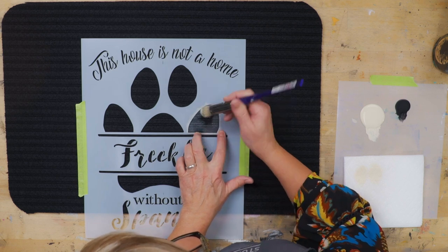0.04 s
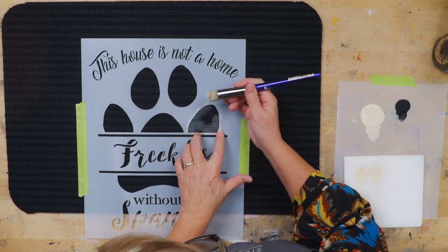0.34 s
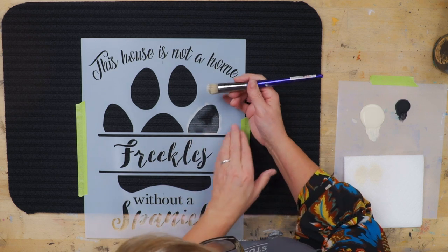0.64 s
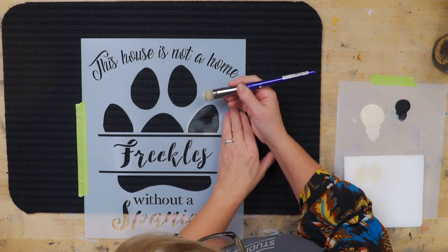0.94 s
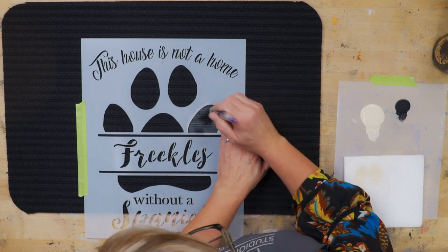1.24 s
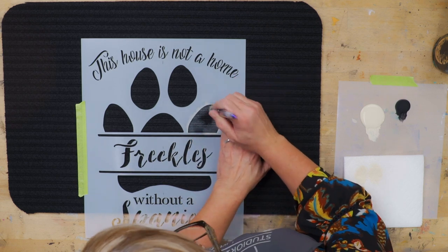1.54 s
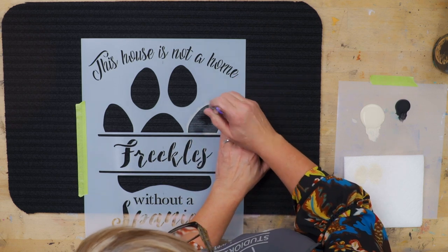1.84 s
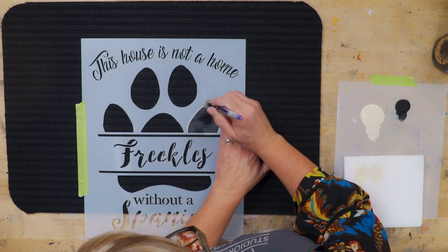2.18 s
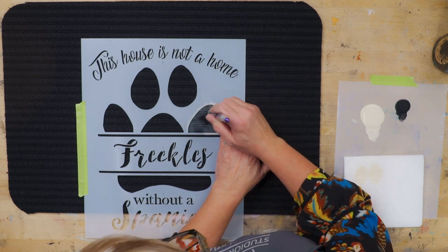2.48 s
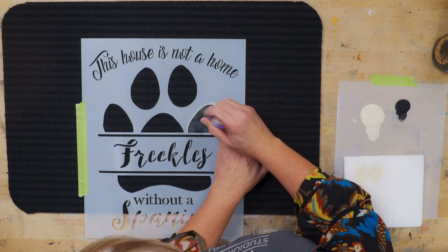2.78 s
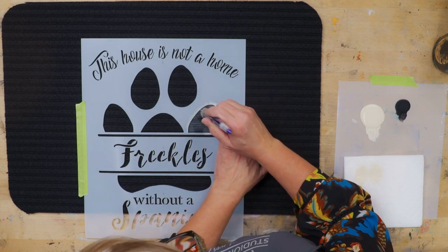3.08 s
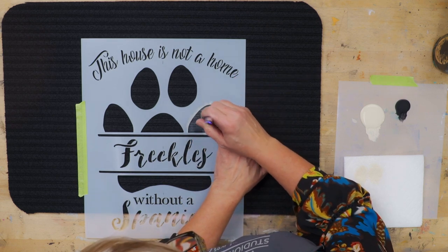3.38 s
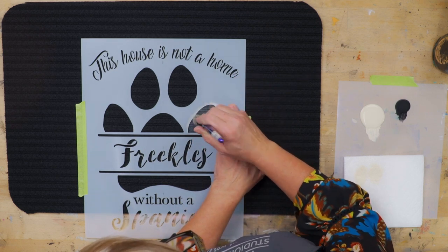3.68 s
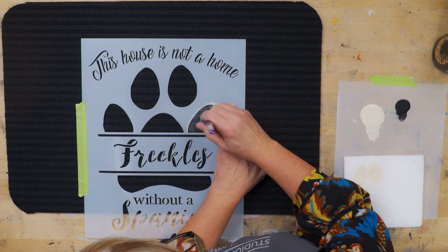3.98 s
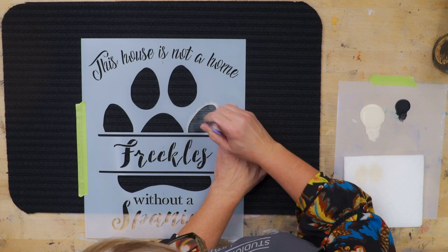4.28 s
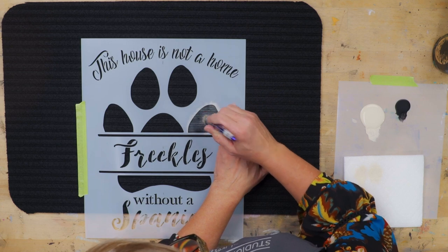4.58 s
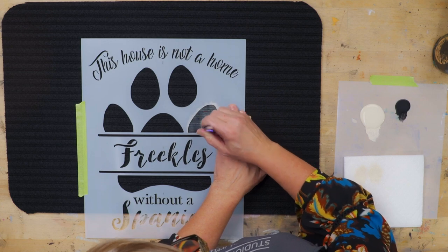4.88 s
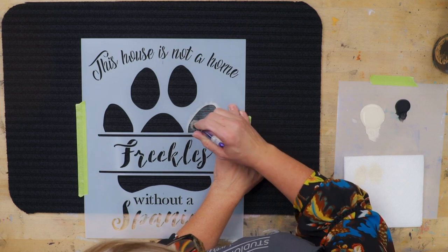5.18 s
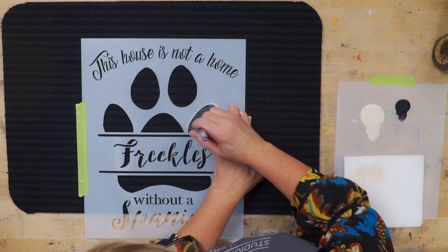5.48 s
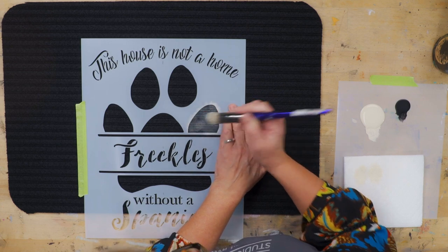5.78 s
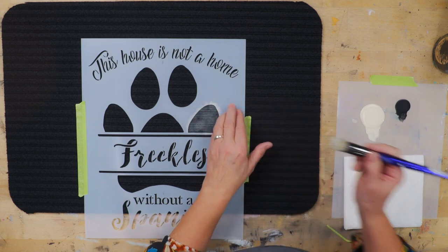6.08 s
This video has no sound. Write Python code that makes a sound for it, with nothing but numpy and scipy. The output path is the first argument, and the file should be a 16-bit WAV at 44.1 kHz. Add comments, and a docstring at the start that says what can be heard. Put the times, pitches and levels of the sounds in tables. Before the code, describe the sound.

In a small, quietly humming room, a hand rustles and slides over a plastic stencil. A bristle brush then dabs through it onto a rubber mat, about five times a second, each dab a short crunch with a soft, hollow table thump. The loose plastic chatters at first, then settles. Finally the hand slides again and lands with a light knock. One microphone hangs above the table.

```python
"""A hand rustles and slides over a plastic stencil on a work table, in a small, quietly humming room.
Then a stencil brush stipples through it onto a rubber mat, about five dabs a second: each a short
crunch of bristles and a soft thump of the table. At first the stencil's loose edge chatters too,
until the dabs pin it down. Last, the hand slides again and settles with a light knock.
One microphone above the table hears it all."""
import sys
import numpy as np
from scipy import signal
from scipy.fft import rfft, irfft
from scipy.io import wavfile
from scipy.ndimage import uniform_filter1d

SR = 44100
rng = np.random.default_rng(int(sys.argv[2]) if len(sys.argv) > 2 else 0)


def generate_wav(sig):
    """Save sig (samples, or channels by samples) to the path in sys.argv[1] as 16-bit PCM at SR."""
    pcm = np.round(np.clip(np.atleast_2d(sig).T, -1, 1) * 32767).astype(np.int16)
    wavfile.write(sys.argv[1], SR, pcm)


N = 274963
TIME = np.arange(N) / SR

# dabs of the brush: (time of greatest force [s], force [dB], contact noise [dB])
DABS = [(1.2951, -32, -43.5), (1.4948, -27.5, -45), (1.6824, -27, -46), (1.87, -27, -45),
        (2.056, -24.5, -43.5), (2.246, -25, -44.5), (2.4429, -27.5, -56.5), (2.628, -25, -60.5),
        (2.8198, -21.5, -57.5), (3.01, -23, -56.5), (3.196, -26, -58.5), (3.3908, -24, -56.5),
        (3.572, -25.5, -56.5), (3.757, -24, -57), (3.9498, -25.5, -59.5), (4.1309, -25, -56),
        (4.3209, -21.5, -56.5), (4.5066, -23.5, -55.5), (4.6972, -24.5, -55), (4.8932, -24.5, -54),
        (5.0782, -24, -56), (5.268, -24.5, -58.5), (5.4498, -24, -51.5)]


def amp(db):
    """Decibels to gain."""
    return 10 ** (np.asarray(db) / 20)


def unit(x):
    """Scales to rms 1."""
    return x / np.sqrt(np.mean(x ** 2) + 1e-24)


def along(points, hz):
    """Reads a table on a log-frequency axis."""
    f, value = np.transpose(points)
    return np.interp(np.log(hz + 1), np.log(f + 1), value)


def add(mix, s, sound):
    """Mixes a sound in at time s."""
    part = mix[max(round(s * SR), 0):][:len(sound)]
    part += sound[:len(part)]


def tint(x, spectrum):
    """Colours a long sound; rms 1."""
    gain = amp(along(spectrum, np.fft.rfftfreq(len(x), 1 / SR)))
    return unit(irfft(rfft(x) * gain, len(x)))


def response(spectrum, size=2048):
    """The causal click that has this spectrum; energy 1."""
    log_gain = np.log(amp(along(spectrum, abs(np.fft.fftfreq(size, 1 / SR)))))
    click = np.fft.ifft(np.exp(np.conj(signal.hilbert(log_gain)))).real[:size // 2]
    return click / np.linalg.norm(click)


def narrow(hz, width):
    """A wavering tone: noise in one narrow resonance."""
    f = np.fft.rfftfreq(N, 1 / SR)
    return unit(irfft(rfft(rng.standard_normal(N)) / (1 + (2 * (f - hz) / width) ** 2), N))


def grains(count, spread_db):
    """Dense tiny slips of uneven size."""
    sizes = np.minimum(rng.standard_normal(count), 2.6)
    return unit(rng.standard_normal(count) * amp(spread_db * sizes))


def wobble(count, size):
    """Random drift, smoothed over size samples; rms 1."""
    return unit(uniform_filter1d(rng.standard_normal(count), size=size))


def sway(s, period_s, crest_s):
    """A slow swing between -1 and 1."""
    return np.cos(2 * np.pi * (s - crest_s) / period_s)


def glide(hz):
    """A sine that follows a moving pitch."""
    return np.sin(2 * np.pi * np.cumsum(hz) / SR)


def mode(t, hz, db, t60):
    """One resonance, dying by 60 dB in t60 seconds."""
    return amp(db - 60 * t / t60) * np.sin(2 * np.pi * hz * t)


def impact(spectrum, decay_s, count):
    """A short, coloured burst of noise; peak 1."""
    t = np.arange(count) / SR
    burst = signal.fftconvolve(rng.standard_normal(count) * np.exp(-t / decay_s), response(spectrum))
    return burst / abs(burst).max()


def tail(build_s, size=16384):
    """Diffuse room echoes that build up and die band by band; energy 1."""
    # decay of the small room: (frequency [Hz], t60 [s])
    room_decay = [(100, 1), (400, 0.75), (1000, 0.43), (3500, 0.3), (8000, 0.41), (16000, .17)]
    hz, t, bands = signal.stft(rng.standard_normal(size), SR, nperseg=256)
    decay = amp(-60 * t / along(room_decay, hz)[:, None])
    diffuse = signal.istft(bands * decay, SR, nperseg=256)[1]
    diffuse *= 1 - np.exp(-np.arange(len(diffuse)) / SR / build_s)
    return diffuse / np.linalg.norm(diffuse)


def echoes(near_db=-9.0, far_db=-21.5, far_s=0.031):
    """Echoes from things near the table, then those from the far walls."""
    out = amp(near_db) * tail(0.0013)
    add(out, far_s, amp(far_db) * tail(0.0011))
    return out


def room(x):
    """Direct sound at the microphone, and its echoes."""
    return x + signal.fftconvolve(x, echoes())[:N]


def room_tone(air_db=-53.0, whine_db=-81, whine_hz=1372, waver_hz=13):
    """Ventilation rumble, its hum and a faint whine that slowly swells and fades."""
    # spectrum of the rumble: (frequency [Hz], relative level [dB])
    air_spectrum = [(10, -20), (25, 3), (36, 0.5), (55, 0), (85, -12), (130, -16), (220, -18), (330, -22.5),
                    (600, -24.5), (1350, -31.5), (2300, -40.5), (5000, -47.5), (10000, -55), (16000, -54.5)]
    # steady tones of the room: (frequency [Hz], width [Hz], level [dB])
    hum_tones = [(47.1, 1.65, -55.5), (119.67, 1.7, -63.5), (168, 5, -80.5), (297.3, 6.7, -74.5),
                 (421.4, 3, -79), (776, 5.4, -82.5), (8000, 4.4, -99)]
    air = amp(air_db) * tint(rng.standard_normal(N), air_spectrum)
    hum = sum(amp(db) * narrow(hz, width) for hz, width, db in hum_tones)
    swell = amp(whine_db + 5 * sway(TIME, period_s=1.7, crest_s=1.03))
    whine = unit(glide(whine_hz + waver_hz * wobble(N, 1000)))
    return air + hum + swell * whine


def strokes(rows, rise_db_per_s, fall_db_per_s):
    """Gain of hand movements that each swell, hold and die away."""
    return sum(amp(db - rise_db_per_s * np.maximum(s - TIME, 0)
                   - fall_db_per_s * np.maximum(TIME - s - hold, 0)) for s, hold, db in rows)


def hand(spread_db=4.0, crinkle_db=4.0):
    """The palm hisses over the plastic; under the fingers the sheet crinkles in short clumps."""
    # movements of palm and fingers: (time at full speed [s], hold [s], level [dB])
    slides = [(.3, .02, -83), (.69, 0.37, -73), (3.42, .1, -80), (6.02, 0.052, -63.5)]
    rustles = [(.135, 0.073, -67), (.95, 0.042, -73.5)]
    # spectra of skin and sheet: (frequency [Hz], relative level [dB])
    slide_spectrum = [(300, -11), (1200, 6.5), (2000, -2), (3600, 0), (5200, -6), (7500, -6),
                      (11000, -12.5), (16000, -20)]
    rustle_spectrum = [(400, -7), (1400, -12), (2300, -4), (3400, -6.5), (4500, -21.5), (8000, -27),
                       (16000, -39)]
    clumps = amp(crinkle_db * wobble(N, 300))
    hiss = tint(grains(N, spread_db), slide_spectrum)
    crinkle = unit(clumps * tint(grains(N, spread_db), rustle_spectrum))
    return (hiss * strokes(slides, rise_db_per_s=66, fall_db_per_s=62)
            + crinkle * strokes(rustles, rise_db_per_s=100, fall_db_per_s=56))


def sheet_ticks(gain_db=-10.0):
    """Tiny snaps of the plastic sheet under the fingers."""
    # snaps: (time [s], relative peak [dB], centre [Hz])
    snaps = [(0.124, -42.5, 2500), (.321, -52, 3400), (.360, -51, 2600), (0.862, -39, 2950),
             (0.871, -44, 3400), (0.931, -56, 3600), (1.146, -46, 4460), (1.412, -46, 2900),
             (4.575, -44, 5450), (5.518, -51.5, 4760), (6.052, -53, 2600)]
    out = np.zeros(N)
    for s, db, hz in snaps:
        spectrum = [(hz / 4, -24), (hz / 1.95, -2), (hz, 0), (hz * 2, -9), (hz * 4, -21)]
        add(out, s, amp(db + gain_db) * impact(spectrum, decay_s=0.005, count=1024))
    return out


def looseness(s, half_pinned_s=2.55, pinning_s=.25, stays_loose=.06):
    """Share of the contact noise that is chatter at time s; it falls as the stencil is pressed down."""
    return stays_loose + (1 - stays_loose) / (1 + np.exp((s - half_pinned_s) / pinning_s))


def first_touch(s, force_db, lead_s=.0015, usual_force_db=-24, lift_s=.0016):
    """When the tips arrive: a gentle dab takes longer to press home; a lifted stencil is met sooner."""
    return s - lead_s * np.sqrt(amp(usual_force_db - force_db)) - lift_s * looseness(s)


def bristle_crunch(spread_db=2.5, rise_s=0.00028, landing_s=.0044, settle_s=.0023):
    """Bristle tips land over a few milliseconds; where the stencil is loose it buzzes against the mat."""
    # spectra of the tips and the loose stencil: (frequency [Hz], relative level [dB])
    bristle_spectrum = [(250, -4.5), (500, -1), (770, -11.5), (1090, -2), (1670, -7.5), (2400, -11.5),
                        (3400, -12.5), (4600, -27.5), (8000, -25.5), (12900, -34), (16000, -29)]
    chatter_spectrum = [(400, -44), (950, -5), (1750, -10), (2150, -5), (2620, -1), (2860, 0), (3170, 0),
                        (3600, 0), (4200, -4), (4650, -6), (5200, -11), (7700, -13), (11000, -17.5),
                        (16000, -30)]
    out, t = np.zeros(N), np.arange(1024) / SR
    bristles, chatter = response(bristle_spectrum), response(chatter_spectrum)
    landing = (1 - np.exp(-t / rise_s)) * np.exp(-np.maximum(t - landing_s, 0) / settle_s)
    for s, force_db, db in DABS:
        touch, loose = first_touch(s, force_db), looseness(s)
        for colour, share in (bristles, 1 - loose), (chatter, loose):
            size = amp(db) * np.sqrt(share * 0.0059 * SR)  # its share of 5.9 ms of noise at this level
            burst = signal.fftconvolve(grains(len(t), spread_db) * landing, colour)
            add(out, touch, size * burst / np.linalg.norm(burst))
            # each direction gets its own mix of the many tips, so echoes keep only the broad colour
            add(out, touch + landing_s / 2, size * signal.fftconvolve(echoes(), colour))
    return out


def stencil_flap(gain_db=-3.0, hold_s=0.0047, fade_db_per_s=17, detune=0.011):
    """A lifted tongue of the stencil sings at its own pitches, less with each dab that pins it down."""
    # modes of the tongue: (frequency [Hz], relative level [dB], t60 [s])
    tongue_modes = [(2100, -7, 0.017), (2610, 5, 0.012), (3174, 8, 0.0049), (3600, -15, 0.011),
                    (4560, -22, .015)]
    out, t = np.zeros(N), np.arange(2048) / SR
    free_s = np.maximum(t - hold_s, 0)
    for s, force_db, db in DABS:
        tunings = 1 + detune * rng.standard_normal(len(tongue_modes))
        ring = sum(amp(mode_db - 60 * free_s / t60) * np.sin(2 * np.pi * hz * tuning * t)
                   for (hz, mode_db, t60), tuning in zip(tongue_modes, tunings))
        pinned_db = fade_db_per_s * (s - DABS[0][0])
        add(out, first_touch(s, force_db), amp(db + gain_db - pinned_db) * ring)
    return out


def table_thumps(push_s=.00102, sink=.356):
    """The mat softens each dab to a smooth push: the top sinks away from the microphone, then rings."""
    # modes of the table: (frequency [Hz], relative level [dB], t60 [s],
    # side [+1 if the near part of the top swings with the blow, -1 if against it])
    table_modes = [(25.2, -9.6, .229, -1), (29.2, -11, .37, 1), (47.3, -27.6, 1.6, 1),
                   (66.3, -3.4, .072, 1), (79.3, -20.4, .473, 1), (100, -21.3, .197, 1),
                   (129.3, -5.9, .133, 1), (140.2, .8, .063, -1), (186.4, -1.2, .099, -1),
                   (232.2, -7.4, .04, 1), (333.1, -8.6, .141, 1), (392.6, -12.5, .218, 1)]
    t, around = np.arange(SR * 3 // 2) / SR, np.arange(-SR // 100, SR // 100) / SR
    ring = sum(side * mode(t, hz, db, t60) for hz, db, t60, side in table_modes)
    push = np.exp(-(around / push_s) ** 2 / 2)
    force = np.zeros(N)
    for s, force_db, _ in DABS:
        add(force, s + around[0], amp(force_db) * push)
    return signal.fftconvolve(force, ring / push.sum())[:N] - sink * force


def hollow_boom(room_db=-1.0, spot_db=4.0, build_s=0.0014):
    """After each thump the top rings hollow and the room booms, varying with the spot that is struck."""
    # hollow modes of the top: (frequency [Hz], relative level [dB], t60 [s])
    hollow_modes = [(187, -25.5, 0.25), (319.4, -33.5, 0.25), (380, -41.5, 0.85), (425, -48, 0.97),
                    (530.4, -40, 0.27)]
    # spectrum of the room's boom: (frequency [Hz], relative level [dB])
    boom_spectrum = [(60, -16), (130, -4), (190, 1), (245, -9.5), (320, -5), (400, -9.5), (460, -19.5),
                     (530, -9.5), (700, -27.5), (1500, -24.5), (4000, -78.5)]
    out, t, colour = np.zeros(N), np.arange(SR // 2) / SR, response(boom_spectrum)
    spots = rng.standard_normal((len(DABS), len(hollow_modes), 2))
    for (s, force_db, _), spot in zip(DABS, spots):
        ring = sum(np.sign(side) * mode(t, hz, db + spot_db * size, t60)
                   for (hz, db, t60), (side, size) in zip(hollow_modes, spot))
        add(out, s, amp(force_db) * ring * (1 - np.exp(-t / build_s)))
        add(out, s, amp(force_db + room_db) * signal.fftconvolve(tail(0.004), colour))
    return out


def bristle_splay(gain_db=-17.5, fade_s=0.038, spread_db=12.0):
    """Single bristles flick sideways while the brush is pressed flat and lifts again."""
    # spectrum of a flick: (frequency [Hz], relative level [dB])
    flick_spectrum = [(800, -24), (2000, 4), (3200, 1), (5000, 1.5), (8000, -4), (12000, -14), (16000, -9)]
    out, t, colour = np.zeros(N), np.arange(SR // 8) / SR, response(flick_spectrum)
    for s, _, db in DABS:
        flicks = grains(len(t), spread_db) * np.exp(-t / fade_s)
        add(out, s, amp(db + gain_db) * signal.fftconvolve(flicks, colour))
    return out


def handle_clack(gain_db=-34, swing_db=5, build_s=0.0033, detune=0.06):
    """The handle gives a short woody knock, louder as the brush wanders onto a ridge of the mat."""
    # modes of the handle: (frequency [Hz], relative level [dB], t60 [s])
    handle_modes = [(734, -3, 0.059), (913, -2.5, 0.13), (1055, 5, 0.038), (1194, 0.5, 0.044),
                    (1900, -22, 0.033)]
    out, t = np.zeros(N), np.arange(4096) / SR
    for s, force_db, _ in DABS:
        tunings = 1 + detune * rng.standard_normal(len(handle_modes))
        ring = sum(mode(t, hz * tuning, db, t60) for (hz, db, t60), tuning in zip(handle_modes, tunings))
        ridge_db = swing_db * sway(s, period_s=1.62, crest_s=1.92)
        add(out, s, amp(force_db + gain_db + ridge_db) * ring * (1 - np.exp(-t / build_s)))
    return out


def table_creak(db=-55.0, waver=0.072):
    """A soft, rough creak that sinks in pitch as the weight on the table shifts."""
    # course of the creak: (time [s], pitch [Hz])
    creak_pitch = [(3.081, 352), (3.2, 319.3), (3.32, 296), (3.42, 263)]
    s, hz = np.transpose(creak_pitch)
    t = np.arange(s[0], s[-1], 1 / SR)
    pitch = np.interp(t, s, hz) * (1 + waver * wobble(len(t), 300))
    grip = wobble(len(t), 900)
    out = np.zeros(N)
    add(out, s[0], amp(db) * grip * signal.windows.tukey(len(t)) * glide(pitch))
    return out


def hand_knocks():
    """The hand settles on the table with a light double knock."""
    # landings of the hand: (time [s], peak [dB])
    landings = [(6.053, -43), (6.0607, -39)]
    # spectrum of a knock: (frequency [Hz], relative level [dB])
    knock_spectrum = [(40, -18), (150, 8.5), (300, 2), (600, -6), (1100, -11), (1600, -5.5), (2200, -13),
                      (3800, -22), (6000, -43), (16000, -58)]
    out = np.zeros(N)
    for s, db in landings:
        add(out, s, amp(db) * impact(knock_spectrum, decay_s=0.0025, count=2048))
    return out


def finger_squeak(start_s=6.064, length_s=0.028, hz=4080, db=-64, waver=0.01):
    """A fingertip squeaks faintly as it stops on the plastic."""
    out, count = np.zeros(N), int(length_s * SR)
    pitch = hz * (1 + waver * wobble(count, 100))
    add(out, start_s, amp(db) * signal.windows.tukey(count) * glide(pitch))
    return out


def scene():
    """Everything as one microphone above the table hears it."""
    table = table_thumps() + hollow_boom()
    brush = bristle_crunch() + bristle_splay() + stencil_flap() + handle_clack()
    fingers = room(sheet_ticks() + hand_knocks() + finger_squeak()) + hand()
    return (table + brush + fingers + table_creak() + room_tone())[None]


def record(dry):
    """The recorder's band limit, at 15.9 kHz."""
    lowpass = signal.firwin(511, 15900, window=("kaiser", 9), fs=SR)
    return signal.oaconvolve(dry, lowpass[None], "same")


dry = scene()
out = record(dry)
generate_wav(out)
```